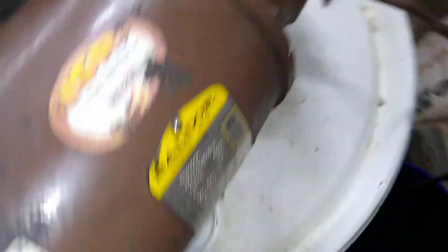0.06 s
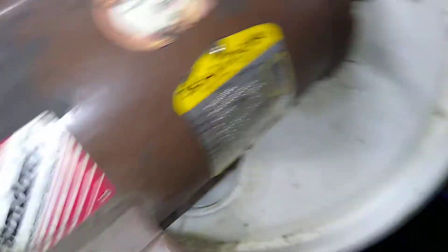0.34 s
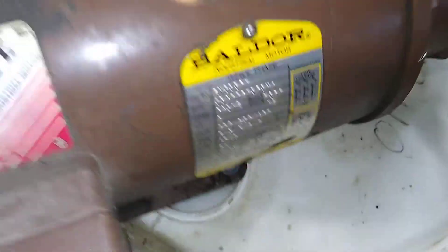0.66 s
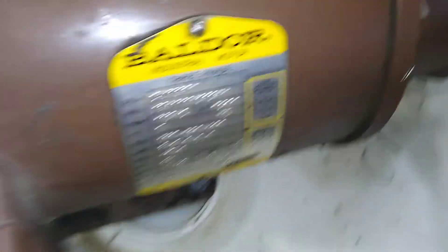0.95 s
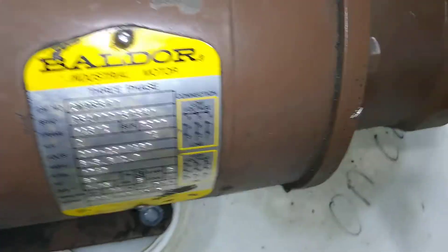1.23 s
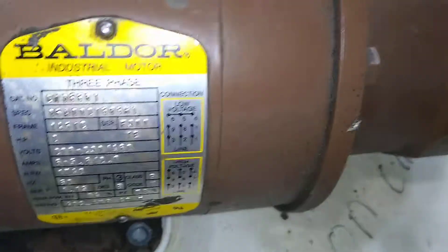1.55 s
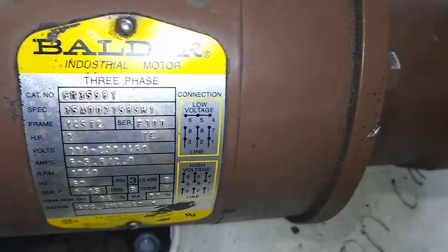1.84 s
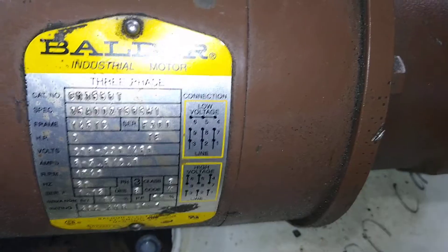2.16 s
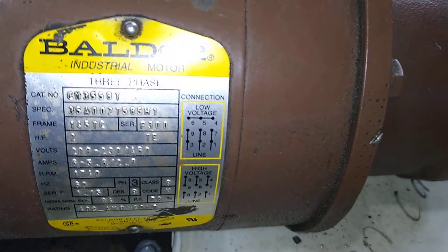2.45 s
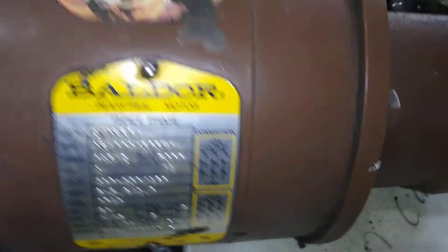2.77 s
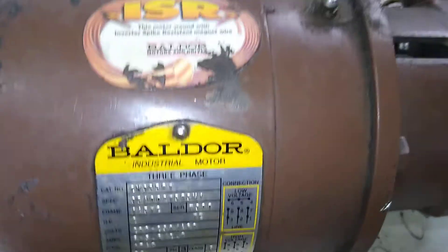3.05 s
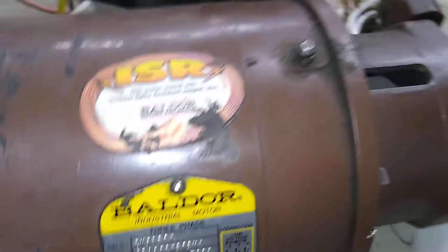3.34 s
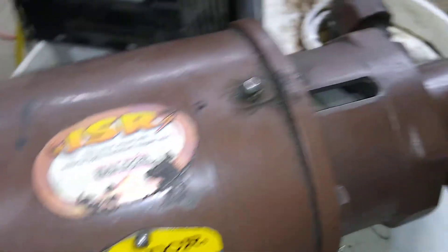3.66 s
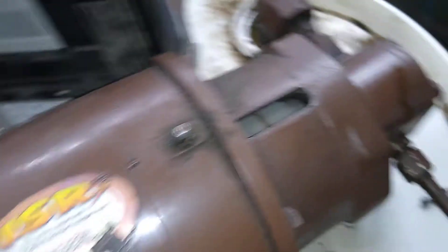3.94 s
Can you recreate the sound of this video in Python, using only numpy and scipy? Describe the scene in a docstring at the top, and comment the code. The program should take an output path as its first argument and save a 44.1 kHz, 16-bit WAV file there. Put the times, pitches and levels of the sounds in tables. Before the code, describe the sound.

An electric pump motor runs with a loud, high-pitched whine over a steady hum.

```python
"""A whining pump motor in a workshop

An inverter feeds a three-phase motor by switching its power very fast, so the windings whine in
clusters of close tones (sidebands). Shaft, pump and magnetic field hum below, over a rush of air and
bearings. A phone near the housing keeps moving through the whine's loud and quiet spots (standing
waves): the tones swell and fade differently in each ear, steadying briefly near the middle."""
import sys
import numpy as np
from scipy import signal
from scipy.fft import rfft, irfft
from scipy.io import wavfile
from scipy.ndimage import map_coordinates

SR = 44100
rng = np.random.default_rng(int(sys.argv[2]) if len(sys.argv) > 2 else 0)


def wav_out(sig):
    """Save sig, one row per channel (or a flat mono array), as 16-bit PCM at SR to the path in sys.argv[1]."""
    wavfile.write(sys.argv[1], SR, np.round(np.clip(np.atleast_2d(sig).T, -1, 1) * 32767).astype(np.int16))


N = 176400
SWITCH_HZ, SUPPLY_HZ, SHAFT_HZ = 4000, 60.35, 30.055
SPOT_SPACING_CM = 2.575  # the standing waves change over about this distance

# the phone's path: t/s, position/cm, share of the sound shaped by standing waves/0-1
PHONE_PATH = [(0, -2, 0.93), (.6, 7, 0.93), (1.1, 14, 1), (1.5, 12.5, 0.64), (2.0, 22, 0), (2.7, 11, 0.68),
              (3.1, 19, 0.99), (4, 23, 0.98)]
# rush of air and bearings: f/Hz, level/dB per Hz
RUSH_SPECTRUM = [(20, -91), (60, -73), (120, -72), (330, -70.5), (420, -76), (500, -62), (560, -73.5),
                 (610, -68.5), (700, -75), (1600, -75.5), (2000, -78.5), (2330, -69), (2550, -78.5),
                 (3050, -81), (3600, -74.5), (4200, -68.5), (4800, -77.5), (5300, -73.5), (5800, -84.5),
                 (6600, -80.5), (7700, -67), (8400, -69), (9600, -72.5), (10400, -69.5), (11500, -67.5),
                 (13000, -69), (14000, -77.5), (15500, -76.5)]
# how alike the noise is in both ears: f/Hz, likeness/0-1
EAR_MATCH = [(50, 0.77), (300, 0.7), (700, 0.64), (1500, 0), (4000, 0.35), (15000, 0.1)]
# air from the cooling fan: f/Hz, level/dB per Hz
FAN_SPECTRUM = [(100, -90), (400, -95), (510, -57), (620, -87), (1000, -86), (1700, -78), (2300, -73.5),
                (3000, -74), (4000, -86), (6000, -74.5), (9000, -70), (15000, -104)]
# the fan air fading: t/s, gain/dB
FAN_GAIN = [(0, -0.5), (.22, -5.5), (.42, -4), (.7, -9), (1.1, -8), (1.5, -28)]
# hand scuffs: t/s, half-length/s, centre f/Hz, left level/dB, right level/dB
HAND_SCUFFS = [(0.41, 0.024, 1320, -40, -46), (0.55, 0.056, 5900, -42, -34)]
# shaft and pump tones ("lead" is how far the left ear's wave is ahead of the right's):
# multiple of the shaft rate, level/dB, left minus right/dB, lead/rad, gain at the start/dB
SHAFT_TONES = [(1, -65, 0, 0, 0), (2, -63, 0, 0, 0), (7, -41, 3, .3, 0), (11, -58, 0, 0, 0),
               (12, -38.4, -1.5, -.2, -9), (13, -60, 0, 0, 0), (20, -48, 3, .4, -3), (21, -53, 2, .3, 0),
               (24, -45, 3.5, .3, -9), (25, -59, 4, .5, 0), (28, -58, 4, .5, 0), (32, -47, -4, .8, -8),
               (34, -50, 0, .8, -4), (36, -47, 2, -1.6, 2), (37, -55, 0, .8, 0), (47, -59, 0, .8, 0),
               (48, -49, 4, 1.2, 0), (60, -57, -2, 1, 0)]
# magnetic hum: multiple of the supply rate, level/dB
MAGNETIC_TONES = [(2, -58), (4, -55.5), (8, -45.5), (10, -47.5)]
# other steady tones, a low hum and a few faint high whistles: f/Hz, level/dB
OTHER_TONES = [(107.7, -64.5), (216, -53), (258.4, -62.5), (275.9, -58.5), (513.4, -51), (590.1, -45),
               (599.6, -46), (2704.4, -53.5), (2884.1, -79), (3219.2, -51.5), (3605.7, -61)]
# the housing's ring: t/s, left level/dB, right level/dB
HOUSING_LEVEL = [(0, -47, -38), (.45, -46, -47), (.6, -54, -56), (.8, -52, -55), (.92, -42.5, -42.5),
                 (2.8, -43.5, -43.5), (4, -44.5, -47)]
# outline of the faint sidebands: f/Hz, level/dB
FAINT_SPECTRUM = [(2000, -73), (2500, -67), (3200, -67), (3700, -63), (4500, -61), (4800, -53.5),
                  (5300, -58), (5800, -107), (7000, -53), (8800, -55), (9800, -77), (10350, -51),
                  (10900, -61), (12500, -67), (13600, -52), (14200, -56), (15500, -56)]
# strong sidebands: cluster number, offset/supply rates, left level/dB, right level/dB, lead/rad
STRONG_SIDEBANDS = [(1, -5, -51, -53, 1.0), (1, -3, -42, -48, -2.0), (1, -1, -40, -44, .9),
                    (1, 1, -43, -47, 2.7), (1, 3, -40, -42, -.4), (1, 7, -38, -41, -2.1),
                    (1, 9, -43, -47, -2.7), (1, 13, -47, -45, -3.0), (1, 15, -54, -49, -2.9),
                    (1, 19, -45, -41, .5), (1, 21, -53, -52, 0), (2, -12, -45, -51, -2.2),
                    (2, -10, -45, -50, .3), (2, -9, -45, -53, -.9), (2, -8, -38, -40, -.8),
                    (2, -7, -44, -48, .4), (2, -6, -27, -29, .6), (2, -5, -41, -45, 1.4),
                    (2, -4, -30, -33, 2.6), (2, -3, -40, -45, -3.0), (2, -2, -31, -41, 2.1),
                    (2, -1, -43, -50, 2.0), (2, 0, -35, -43, 2.5), (2, 1, -50, -55, 1.1),
                    (2, 2, -31, -41, 2.5), (2, 4, -32, -38, 2.4), (2, 6, -28, -34, -2.9),
                    (2, 8, -36, -38, -.1), (2, 10, -50, -47, -2.3), (2, 16, -48, -52, 3.0),
                    (3, -27, -51, -52, .5), (3, -25, -52, -54, 0), (3, -9, -39.5, -40.5, -.3),
                    (3, -7, -44, -43, 1.6), (3, -2, -48, -51, .8), (3, 5, -47, -49, -.2),
                    (3, 7, -49, -49, 1.7), (3, 9, -51, -49, .5), (3, 11, -46, -49, 1.6),
                    (3, 25, -49, -56, -2.1)]
# all the top treble: t/s, left gain/dB, right gain/dB
TREBLE_GAIN = [(0, 2.5, -28), (.45, 3.5, -26), (.5, 1.5, -14), (.6, 2, -7), (.68, 2.5, 3.5), (.85, 3, 1.5),
               (1.25, 0.5, -1.5), (2, 0, 1), (2.7, 0, 0), (3.2, 0, -1.5), (4, -1.5, -5.5)]
# the third cluster's strong pair, then its other tones: t/s, gain/dB
THIRD_PAIR_GAIN = [(0, 3), (.3, 2), (.45, -2), (.7, 3.5), (1.25, -14), (1.5, 1.5), (2.8, 0), (3, -17),
                   (3.25, -8), (3.5, 4), (4, 2)]
THIRD_REST_GAIN = [(0, 4), (.7, -8), (1.2, -1), (1.5, -6), (2.8, -2), (3.05, 8), (3.6, 1), (4, 8)]
# the first cluster: t/s, gain/dB
FIRST_GAIN = [(0, -0.5), (.33, -4.5), (.65, 0.5), (1.4, -2), (2.7, -2), (3.1, -1.5), (4, -3.5)]
# the second cluster's lower and upper halves: t/s, left gain/dB, right gain/dB, lead/rad
SECOND_LOWER = [(0.01, -3.5, -1.0, -1.5), (0.27, 6.3, 2.3, 0.5), (0.34, 2.8, 3.0, 0.8),
                (0.43, -8.7, 1.6, 0.4), (0.46, -7.4, -1.4, 0.2), (0.63, -1.3, 7.6, -0.2),
                (0.85, -7.2, -1.7, -2.4), (0.94, -3.5, -3.3, -2.0), (1.08, -3.1, 4.4, -0.4),
                (1.18, -1.4, -0.1, 0.5), (1.48, -3.5, -0.3, 2.4), (1.89, -0.3, -0.1, 1.2),
                (2.6, 0.2, -3.0, 1.2), (3.14, -2.2, -1.2, 0.3), (3.31, -4.1, -2.9, 1.2),
                (3.38, -6.9, -4.2, 4.6), (3.61, -7.3, -4.0, 7.2), (3.71, -2.7, -1.5, 8.7),
                (3.98, 0.6, -0.0, 10.0)]
SECOND_UPPER = [(0.01, -0.9, 2.6, -0.9), (0.1, -0.7, 5.3, 1.0), (0.24, 4.1, 1.9, -0.5),
                (0.66, -7.4, 8.3, -6.3), (0.85, -1.6, 7.5, -8.7), (0.97, -8.9, 1.3, -8.6),
                (1.12, -3.8, 6.5, -5.2), (1.35, -9.0, -4.7, -6.6), (1.47, -5.8, 0.4, -9.6),
                (1.66, -0.8, -2.7, -9.7), (2.57, 1.5, 0.6, -9.5), (2.74, 0.7, -2.6, -9.8),
                (2.84, -4.7, -0.3, -8.1), (2.99, 0.9, -1.8, -6.5), (3.32, 0.8, -0.1, -6.0),
                (3.4, 0.3, 3.8, -5.6), (3.59, 1.9, 1.4, -5.9), (3.86, -1.7, 2.1, -4.8),
                (3.98, 2.1, 4.9, -6.1)]
# the loudest sideband: t/s, left level/dB, right level/dB, lead/rad
WHISTLE_AT_EARS = [(0.01, -37.8, -37.9, 1.8), (0.07, -36.1, -34.4, 1.1), (0.13, -39.3, -42.1, 0.0),
                   (0.31, -53.4, -36.3, -2.2), (0.34, -57.6, -33.4, -5.0), (0.4, -35.1, -30.7, -5.3),
                   (0.45, -27.0, -27.3, -5.4), (0.55, -26.2, -26.6, -4.9), (0.69, -25.2, -19.8, -5.6),
                   (0.73, -26.2, -20.3, -6.0), (0.82, -24.0, -26.1, -5.4), (0.99, -29.1, -23.0, -4.0),
                   (1.06, -30.9, -21.6, -4.1), (1.11, -27.5, -22, -3.8), (1.15, -23.6, -23.9, -3.1),
                   (1.2, -26.1, -20.4, -3.2), (1.3, -23.6, -21.7, -2.4), (1.45, -24.0, -26.3, -1.9),
                   (1.92, -29.8, -21.6, -1.9), (2.08, -27.5, -21.8, -2.3), (2.39, -31.3, -23.3, -2.1),
                   (2.72, -30.3, -25.6, -2.0), (2.84, -25.4, -27.8, -3.1), (2.96, -24.0, -20.3, -3.3),
                   (3.01, -21.3, -21.6, -3.2), (3.07, -25.4, -19.6, -3.3), (3.11, -22.6, -22.8, -3.1),
                   (3.17, -25.9, -20.8, -3.3), (3.21, -23, -22.6, -3.2), (3.26, -24.5, -21, -3.3),
                   (3.58, -22.4, -22.1, -2.9), (3.68, -23, -23, -3.1), (3.73, -23.3, -23.5, -2.6),
                   (3.85, -24.6, -23.5, -2.1), (3.98, -27.4, -20.0, -1.6)]


def undb(db):
    """Turn decibels into a gain."""
    return 10 ** (np.asarray(db) / 20)


def curve(rows):
    """Join each column's points with straight lines in time."""
    rows = np.array(rows, float)
    return np.array([np.interp(np.arange(N) / SR, rows[:, 0], col) for col in rows.T[1:]])


def at_hz(rows, hz):
    """Read a table by frequency, with octaves evenly spaced."""
    rows = np.array(rows, float)
    return np.interp(np.log(np.maximum(hz, 1)), np.log(rows[:, 0]), rows[:, 1])


def ripple(place, size=512):
    """A smooth random wobble (complex), with about one new value per unit of place."""
    knots = rng.standard_normal((2, size))
    real, imag = [map_coordinates(k, [place[::50]], mode="mirror") for k in knots]
    return np.interp(np.arange(N), np.arange(0, N, 50), real + 1j * imag) / np.sqrt(np.pi * 3 / 5)


def waver(depth, rate_hz):
    """A gain that wobbles randomly around 1."""
    return 1 + depth * ripple(np.arange(N) / SR * rate_hz)


def blend(shared, own, likeness):
    """Mix two unrelated wobbles, keeping their power."""
    return likeness * shared + np.sqrt(1 - likeness ** 2) * own


def spin(hz):
    """A steady complex tone; its real part is the sound."""
    return np.sqrt(2) * np.exp(2j * np.pi * hz * np.arange(N) / SR)


def rush(spectrum, flicker_db=.25):
    """Noise of air or bearings, more alike in both ears in the bass than in the treble."""
    hz = np.arange(N // 2 + 1) * SR / N
    mid, side = rfft(rng.standard_normal((2, N)))
    alike = np.clip(at_hz(EAR_MATCH, hz), 0, 1)
    ears = mid * np.sqrt(1 + alike) + side * np.sqrt(1 - alike) * np.array([[1], [-1]])
    flicker = undb(flicker_db * ripple(np.arange(N) / SR * 12).real)
    return irfft(ears * undb(at_hz(spectrum, hz)), N) * np.sqrt(SR) / 2 * flicker


def fan_air():
    """Air from the cooling fan, loudest where the phone starts."""
    return rush(FAN_SPECTRUM) * undb(curve(FAN_GAIN))


def scuffs(band_ratio=1.27):
    """The hand rubs the phone, making short, soft swells of noise."""
    t, out = np.arange(N) / SR, 0
    for time, length, hz, left_db, right_db in HAND_SCUFFS:
        band = signal.butter(2, [hz / band_ratio, hz * band_ratio], "band", fs=SR, output="sos")
        noise = signal.sosfilt(band, rng.standard_normal((2, N)))
        swell = np.exp(-((t - time) / length) ** 2)
        out += noise / noise.std() * undb([[left_db], [right_db]]) * swell
    return out


def hum_tone(hz, db, pan_db, lead):
    """One slightly wavering tone of the hum, placed between the ears."""
    wave = spin(hz) * waver(depth=.076, rate_hz=9) * undb(db)
    balance = undb(np.array([[pan_db], [-pan_db]]) / 2)
    phase = 2 * np.pi * rng.random() + np.array([[lead], [0]])
    return (wave * balance * np.exp(1j * phase)).real


def hum(approach_s=1.58, pump_multiple=12, throb_hz=1.79):
    """Shaft, magnetic and other tones; the hum grows as the phone comes round to the pump end."""
    t, out = np.arange(N) / SR, 0
    away = np.clip(1 - t / approach_s, 0, 1)
    throb_db = 3.3 * np.cos(2 * np.pi * throb_hz * (t - 2.07))
    for multiple, db, pan_db, lead, start_db in SHAFT_TONES:
        if multiple == pump_multiple:  # the pump tone throbs as the rotor slips behind the field
            db = db + throb_db
        out += hum_tone(multiple * SHAFT_HZ, db + start_db * away, pan_db, lead)
    magnetic = [(multiple * SUPPLY_HZ, db) for multiple, db in MAGNETIC_TONES]
    for hz, db in magnetic + list(OTHER_TONES):
        lead = min(hz / 1000, 1) * rng.standard_normal()
        start_db = -4 if hz > 300 else 0
        out += hum_tone(hz, db + start_db * away, 0, lead)
    return out


def housing_ring(hz=2363.3, width_hz=200):
    """The bearings make the housing ring: two close tones beat roughly over a narrow band of noise."""
    tones = (spin(hz) + undb(-11) * spin(hz - SHAFT_HZ)).real
    roughness = waver(depth=.22, rate_hz=60).real
    noise = (spin(hz) * ripple(np.arange(N) / SR * width_hz, size=2048)).real
    return (tones * roughness + undb(-7) * noise) * undb(curve(HOUSING_LEVEL))


def faint_sidebands(paths=3, turn_rad=2.5):
    """Many faint switching tones arrive by several paths, so each swells and fades as the phone moves."""
    flutter = waver(depth=.05, rate_hz=45)
    multiple, offset = (grid.ravel() for grid in np.meshgrid(np.arange(1, 5), np.arange(-33, 34)))
    hz = multiple * SWITCH_HZ + offset * SUPPLY_HZ
    size = undb(at_hz(FAINT_SPECTRUM, hz) - 7 * ((multiple + offset) % 2))  # every other tone is weaker
    position, out = curve(PHONE_PATH)[0], 0
    for _ in range(paths):
        phases = 2 * np.pi * rng.random((2, len(hz)))
        spectrum = np.zeros((2, N), complex)
        spectrum[:, np.round(hz * N / SR).astype(int)] = size * np.exp(1j * phases)
        phase_shift = turn_rad * ripple(position / SPOT_SPACING_CM).real
        out += np.fft.ifft(spectrum) * N * np.exp(1j * phase_shift)
    return (out * flutter).real * np.sqrt(2 / paths)


def standing_wave(position, common_lead):
    """Loud and quiet spots along the path; with a common lead, both ears get nearly the same wave."""
    place = position / SPOT_SPACING_CM
    own = np.array([ripple(place) for _ in range(2)])
    if common_lead is None:
        return own
    shared = ripple(place) * np.exp(-1j * common_lead * np.array([[0], [1]]))
    return blend(shared, own, likeness=.9)


def cluster(number, above=-np.inf, up_to=np.inf, common_lead=None, scatter_rad=.75):
    """Sidebands around one multiple of the switching rate; standing waves trade level among them."""
    flutter = waver(depth=.05, rate_hz=45)
    position, share = curve(PHONE_PATH)
    share = np.clip(share, 0, 1)
    field = standing_wave(position, common_lead)
    out, power, steady_power = 0, 0, 0
    for multiple, offset, left_db, right_db, lead in STRONG_SIDEBANDS:
        if multiple == number and above < offset <= up_to:
            # neighbouring tones swell and fade somewhat alike
            field = blend(field, standing_wave(position, common_lead), likeness=.45)
            size = undb([[left_db], [right_db]])
            direct = np.sqrt(1 - share ** 2) * np.exp(-1j * np.array([[0], [lead]]))
            gain = size * (direct + share * field)
            # roughly in step, the tones pulse twice per supply cycle
            phase = scatter_rad * rng.standard_normal()
            out += gain * np.exp(1j * phase) * spin(number * SWITCH_HZ + offset * SUPPLY_HZ)
            power += abs(gain) ** 2
            steady_power += size ** 2
    return (out * flutter).real * np.sqrt(steady_power / power)


def with_treble(background, split_hz=8000, buzz_depth=.2):
    """The top buzzes with the magnetic field, gains the third cluster and is shaded from either ear."""
    top = signal.sosfiltfilt(signal.butter(3, split_hz, "high", fs=SR, output="sos"), background)
    buzz = 1 + buzz_depth * np.cos(2 * np.pi * 2 * SUPPLY_HZ * np.arange(N) / SR)
    pair = cluster(3, above=-11, up_to=-7) * undb(curve(THIRD_PAIR_GAIN))
    others = (cluster(3, up_to=-11) + cluster(3, above=-7)) * undb(curve(THIRD_REST_GAIN))
    return background - top + (top * buzz + pair + others) * undb(curve(TREBLE_GAIN))


def whine():
    """The windings sing around the switching rate and around twice that rate."""
    lower, upper = curve(SECOND_LOWER), curve(SECOND_UPPER)
    return (cluster(1) * undb(curve(FIRST_GAIN))
            + cluster(2, up_to=-1, common_lead=lower[2]) * undb(lower[:2])
            + cluster(2, above=-1, common_lead=upper[2]) * undb(upper[:2]))


def whistle():
    """One sideband hits a natural pitch of the motor's still part (the stator) and stands out."""
    left_db, right_db, lead = curve(WHISTLE_AT_EARS)
    tone = spin(SWITCH_HZ + 5 * SUPPLY_HZ) * waver(depth=.05, rate_hz=45)
    return undb([left_db, right_db]) * np.array([tone, tone * np.exp(-1j * lead)]).real


def scene():
    """Add up all the sounds for the left and right ear."""
    background = with_treble(rush(RUSH_SPECTRUM) + faint_sidebands())
    return background + whine() + fan_air() + whistle() + hum() + housing_ring() + scuffs()


def record(dry):
    """The phone steeply cuts the highest treble."""
    cutoff_hz = 15450
    return signal.sosfilt(signal.ellip(12, .1, 80, cutoff_hz, fs=SR, output="sos"), dry)


dry = scene()
out = record(dry)
wav_out(out)
```